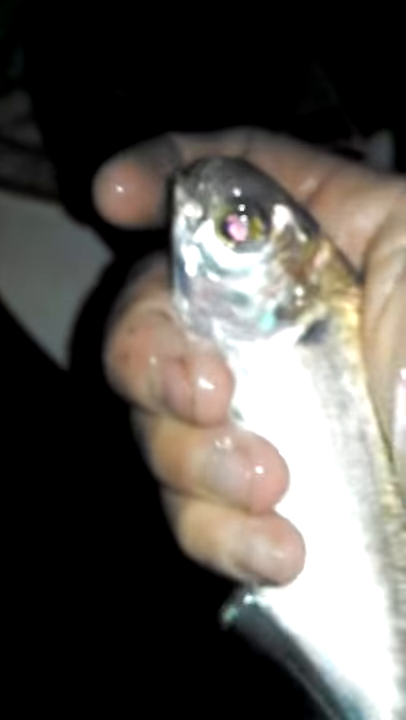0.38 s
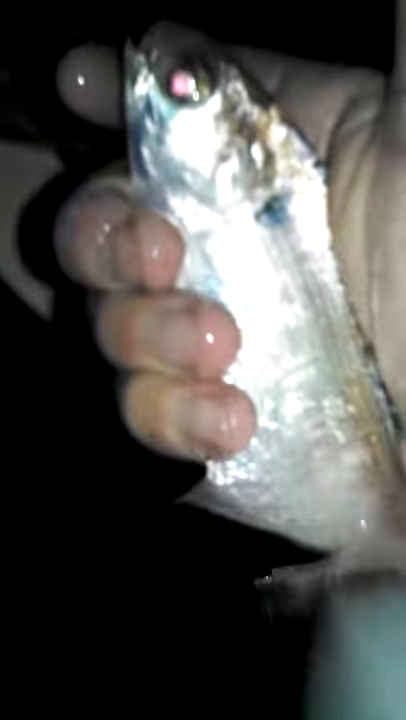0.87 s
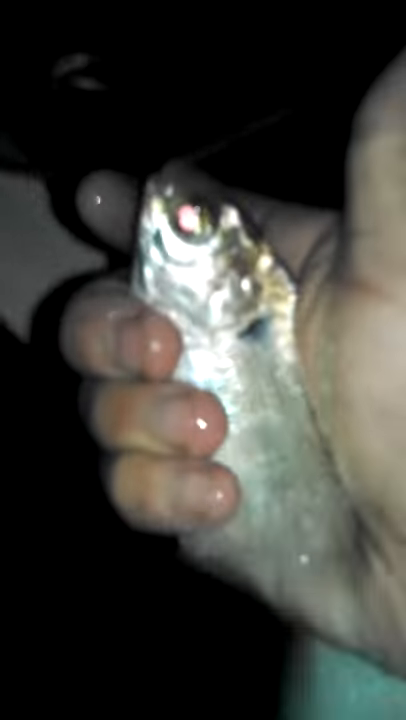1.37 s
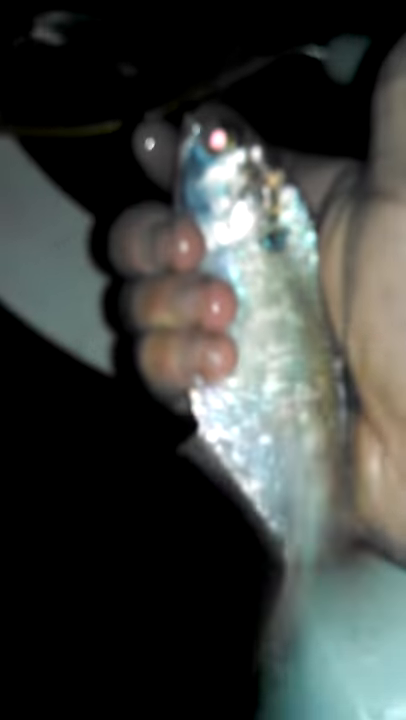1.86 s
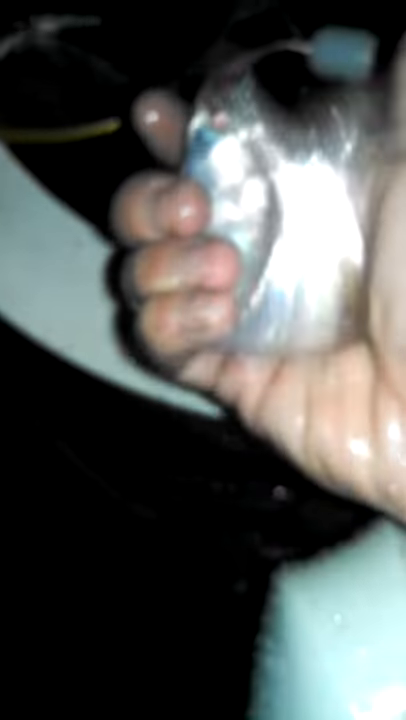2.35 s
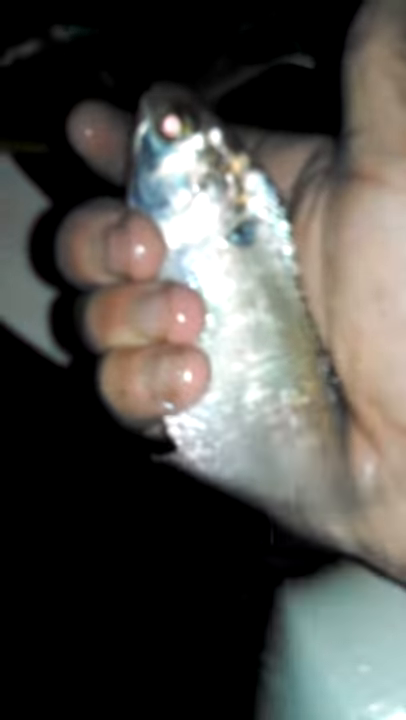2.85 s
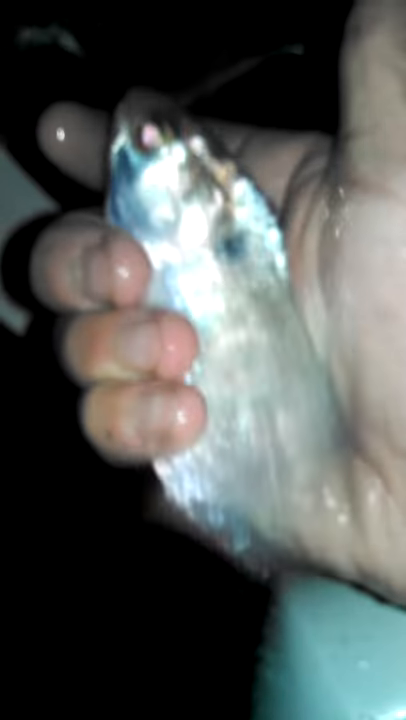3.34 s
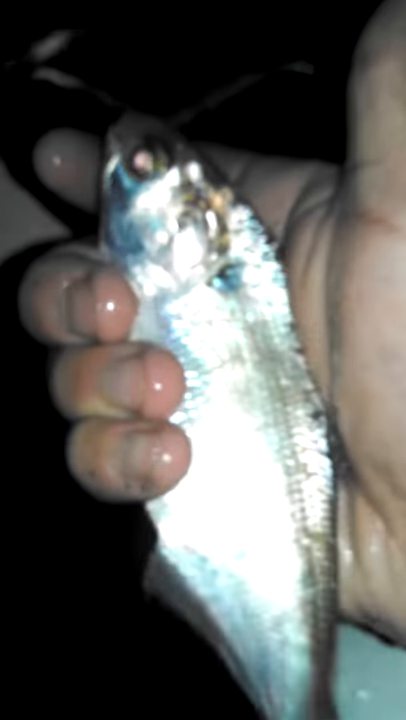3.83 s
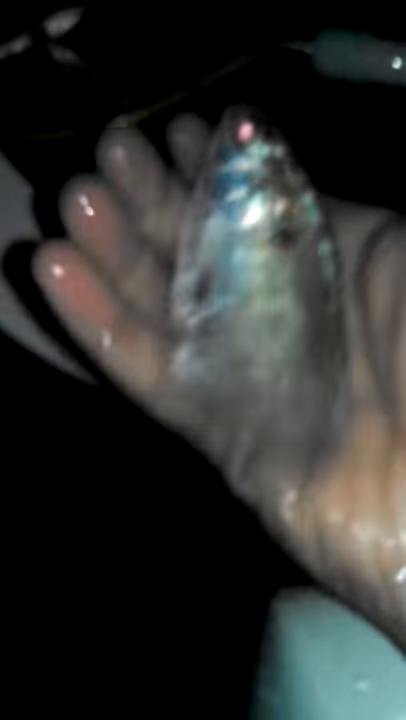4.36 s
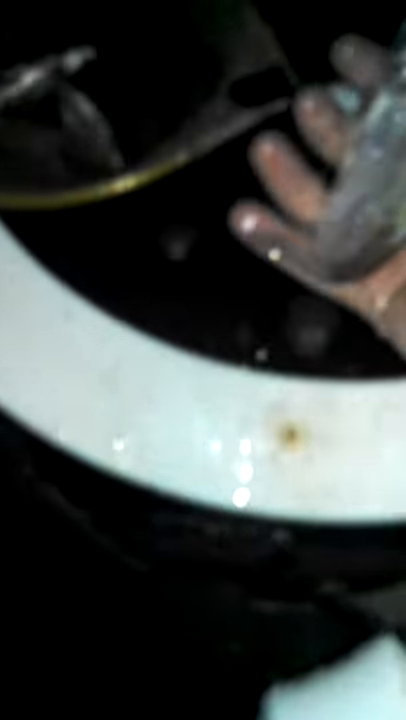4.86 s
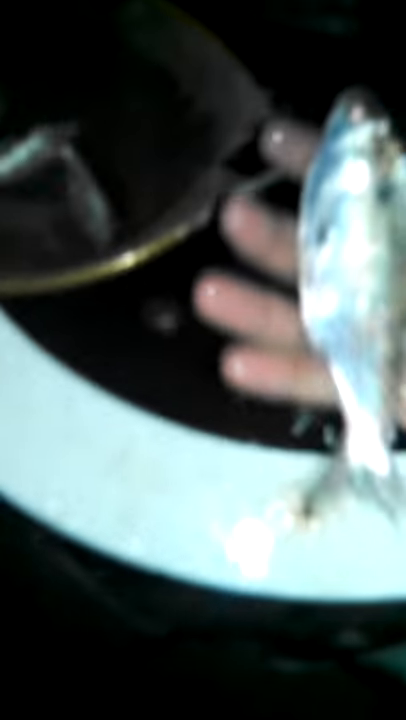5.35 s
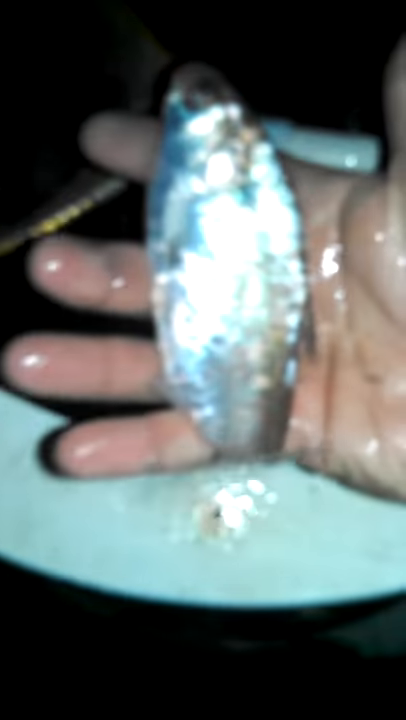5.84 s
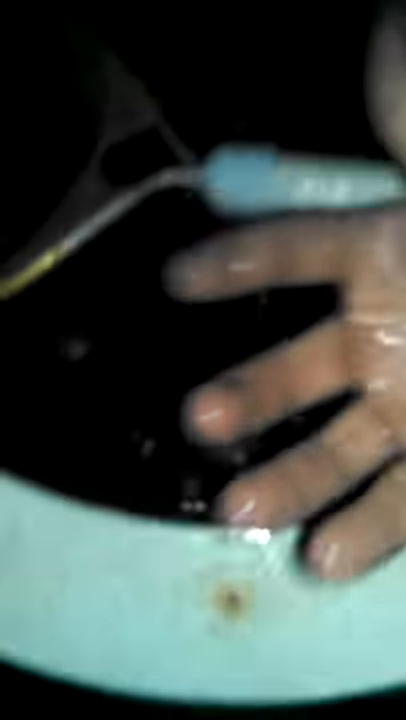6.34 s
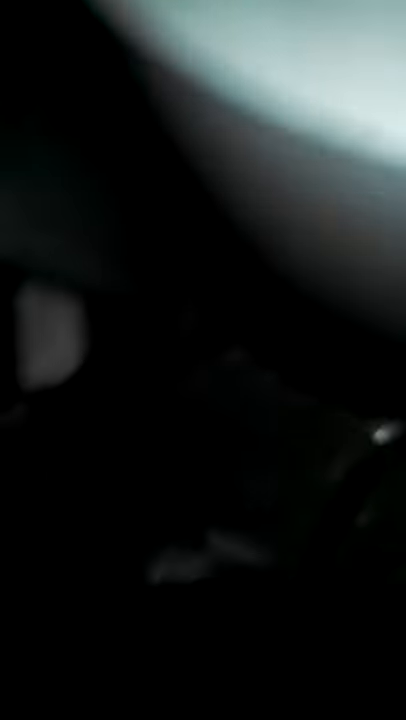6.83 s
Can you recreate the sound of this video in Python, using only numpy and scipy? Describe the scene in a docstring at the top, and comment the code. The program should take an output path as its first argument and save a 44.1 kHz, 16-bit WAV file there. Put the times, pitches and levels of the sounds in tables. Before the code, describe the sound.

From the first moment to the end at about 7.2 seconds, a small pump runs in a fish tank: a low, buzzing hum near 49 hertz with strong overtones, sagging very slightly in pitch after 3 seconds. Over it lies an even, grainy hiss of churned water, bubbling and hollow with tank resonances, its low gurgle gently rising and falling. Very short, bright drop ticks click irregularly, with strong ones near 0.3, 1.3, 2.6, 3.8, 4.3, 4.9 and 5.6 seconds; each loud tick pushes the whole sound down, and it creeps back up. Around 6.2 to 6.3 seconds two dull bumps strike the casing, then a firmer knock at 6.55, fainter thumps, and a brighter knock near 7.17. Meanwhile the hum's second overtone swells and its upper buzz fades. The phone pickup is close, wide and slightly processed, with the extreme treble cut.

```python
"""A small pump hums and churns the water of a bait tank; drops tick, a hand bumps the casing near the end.
Hum: multiples of the shaft rate. Churn: bursting-bubble noise coloured by tank resonances.
Ticks and bumps: short decaying sines. A phone hears it through two microphones, subtracts from each
the delayed other one to widen the image, and limits: loud ticks duck the whole sound, which creeps back up."""
import sys
import numpy as np
from scipy import signal
from scipy.fft import rfft, irfft, next_fast_len
from scipy.io import wavfile

SR = 44100
rng = np.random.default_rng(int(sys.argv[2]) if len(sys.argv) > 2 else 0)


def bounce(signal):
    """Save signal as a 16-bit WAV file at the path given by the first command-line argument."""
    frames = np.transpose(np.atleast_2d(signal))
    limited = np.clip(frames, -1, 1)
    pcm = np.round(limited * 32767).astype(np.int16)
    wavfile.write(sys.argv[1], SR, pcm)


def magnitude_from_level(level_db):
    """Linear magnitude for a level in decibels (20 dB per decade)."""
    exponent = np.asarray(level_db, float) / 20
    return 10 ** exponent


N = 317520


def rms_one(x):
    """Scale to unit rms."""
    return x / np.sqrt(np.mean(x ** 2) + 1e-20)


def at_hz(rows, hz):
    """Columns of a frequency table, interpolated on a log axis."""
    centre_hz, *columns = np.transpose(rows)
    return [np.interp(np.log(hz), np.log(centre_hz), c) for c in columns]


def in_time(rows):
    """Columns of a time table at every sample."""
    s, *columns = np.transpose(rows)
    return [np.interp(np.arange(N) / SR, s, c) for c in columns]


def drift(rate_hz):
    """Slow unit-rms noise: white noise through two equal poles at rate_hz, run at SR / 40."""
    pole = np.exp(-80 * np.pi * rate_hz / SR)
    noise = rng.standard_normal(N // 40 + 2002)
    slow = signal.lfilter([1], [1, -2 * pole, pole * pole], noise)[2000:]   # settled part
    return np.interp(np.arange(N) / 40, np.arange(len(slow)), rms_one(slow))


def ping(hz, t60_s):
    """Exponentially decaying sine, 0.1 s long, peak 1."""
    t = np.arange(round(.1 * SR)) / SR
    wave = np.sin(2 * np.pi * hz * t) * magnitude_from_level(-60 * t / t60_s)
    return wave / np.abs(wave).max()


def add(track, s, sound):
    """Mix a sound into the track at s seconds."""
    i = round(s * SR)
    track[..., i:i + sound.shape[-1]] += sound[..., :N - i]


# shaft harmonics before the late shift in balance:
# (multiple of shaft rate [1], front level [dB rms], rear minus front [dB], rear phase lead [rad])
HARMONICS = [(1, -36, 2, -0.12), (2, -36.5, -3.5, -0.5), (3, -33, 2, -0.38), (4, -52, 2, -0.34),
             (5, -48.5, 0, -0.24), (6, -59.5, -4, -.33), (7, -55, 5.5, -0.77), (9, -63.5, 3.5, -1.7),
             (10, -54, -3.5, -0.63), (12, -58, -6, -0.52)]
SECOND_SWELL_DB, UPPER_FADE_DB = 7.5, -6.0   # late change of multiple 2, of multiples above 3
LEAD_LEFT = 0.7   # share of the rear phase lead left after the shift


def hum(angle_rad, swing, waver_db, spread_rad):
    """Wavering multiples of the shaft rate, higher ones further out of step; swing 0-1 shifts their balance."""
    out = np.zeros((2, N))
    lead_share = 1 - (1 - LEAD_LEFT) * swing
    for multiple, db, rear_db, lead_rad in HARMONICS:
        swing_db = swing * (SECOND_SWELL_DB * (multiple == 2) + UPPER_FADE_DB * (multiple > 3))
        height = np.sqrt(2) * magnitude_from_level(db + swing_db + waver_db * multiple * drift(2.8))
        phase = multiple * angle_rad + spread_rad * multiple ** 2
        front = np.cos(phase)
        rear = magnitude_from_level(rear_db) * np.cos(phase + lead_rad * lead_share)
        out += height * np.array([front, rear])
    return out


def bursts(gurgle_db, cycles_apart, spread_db, grain_share, patchy_db):
    """Two unrelated swarms of bursting bubbles over a smooth rush, in third-octave bands; flat, 0 dB per Hz."""
    out, surge = 0, drift(17.0)
    edges_hz = 25 * 2 ** (np.arange(29) / 3)
    rush, chance = rng.standard_normal((2, N)), rng.random((2, N))
    sizes = magnitude_from_level(spread_db * np.minimum(rng.exponential(1, (2, N)), 5))
    sizes = sizes * rng.choice([-1, 1], (2, N))
    for k, (low, high) in enumerate(zip(edges_hz, edges_hz[1:])):
        shift = k * (N // 31)   # each band reads the draws from another place
        # small bubbles ring higher and burst more often
        burst = np.roll(chance, 2 * shift, axis=1) < low / cycles_apart / SR
        pops = rms_one(np.roll(sizes, shift, axis=1) * burst)
        share = np.clip(grain_share, 0, 1) / (1 + (650 / low) ** 2)   # the low rush is smooth
        drive = np.sqrt(share) * pops + np.sqrt(1 - share) * np.roll(rush, shift, axis=1)
        band = signal.sosfilt(signal.butter(2, [low, high], "band", fs=SR, output="sos"), drive)
        swell_db = gurgle_db / (1 + (low / 1600) ** 4)   # big bubbles come in clusters
        out = out + band * magnitude_from_level(swell_db + patchy_db * (0.63 * surge + drift(17.6)))
    return rms_one(out) * np.sqrt(edges_hz[-1])


# churned water at the front microphone before the resonances: (frequency [Hz], density [dB per Hz])
CHURN_COLOUR = [(30, -52), (70, -63), (130, -66), (220, -72), (400, -73.5), (610, -76.5), (800, -71.5),
                (1500, -71.5), (3000, -72), (3700, -75.5), (4700, -70.5), (7000, -70), (9000, -70),
                (10500, -77), (12500, -75.5), (14800, -78.5)]
# tank and air-space resonances, a negative rise being a dip:
# (centre [Hz], full width at 3/4 of the dB rise [Hz], rise [dB])
TANK_MODES = [(274, 24, 9), (508, 42, 10), (687.2, 53.5, 16.5), (945, 65, 7.5), (1047.5, 70, 10.5),
              (1108, 85, 2), (1361, 38, 10.5), (1506, 9.7, 6), (1614, 16, 8), (1830, 104, 3),
              (2013, 40, 11.5), (2191, 30, 10.5), (2543, 110, 5.5), (2863, 67, -4.5), (2915, 89, 12.5)]
# rear microphone: (frequency [Hz], rear minus front [dB], likeness [0-1], phase lead [rad])
REAR_CHURN = [(30, -4.9, 0.82, -3), (65, -1, 0.96, 0.7), (219, -1, 0.91, -1.16), (376, 2, 0.9, 0),
              (500, -1, 0.76, -1.84), (600, -6, 0.7, 0.5), (716, 4, 0.95, -0.45), (807, -2, 0.5, -1.7),
              (1030, -2, 0.79, -2.0), (1670, 1, 0.91, -2.5), (1945, -8.5, 0.17, -3),
              (2152, -1.5, 0.65, -3.5), (3166, 5, 0.56, -6), (4710, -4.5, 0.42, -8), (6830, -5.5, 0, -7),
              (9700, -4, 0, -12.5), (14900, 7.5, 0.15, -7)]


def churn(angle_rad, gurgle_db, throb):
    """Bubble noise coloured by the tank; the rear microphone shares part of it, shifted in phase and level."""
    size = next_fast_len(N)
    hz = np.arange(size // 2 + 1) * SR / size + 1e-3   # keeps the log finite
    bubbles = bursts(gurgle_db, cycles_apart=4.0, spread_db=4.5, grain_share=0.48, patchy_db=1.61)
    # the impeller pushes the jet once a turn
    shared, apart = rfft(bubbles * (1 + throb * np.cos(angle_rad)), size)
    colour = magnitude_from_level(at_hz(CHURN_COLOUR, hz)[0])
    for centre_hz, width_hz, rise_db in TANK_MODES:
        colour = colour * magnitude_from_level(rise_db / (1 + (2 * (hz - centre_hz) / width_hz) ** 2 / 3))
    rear_db, alike, lead_rad = at_hz(REAR_CHURN, hz)
    alike = np.clip(alike, 0, 1)
    rear = alike * np.exp(1j * lead_rad) * shared + np.sqrt(1 - alike ** 2) * apart
    return irfft(colour * np.array([shared, magnitude_from_level(rear_db) * rear]), size)[:, :N]


# loudest drops at the front microphone, before widening and limiting: (time [s], peak level [dB])
LOUD_TICKS = [(.2931, -8.5), (1.0307, -13.5), (1.1006, -14), (1.1598, -10.5), (1.2939, -9), (1.3361, -7.5),
              (2.034, -11), (2.521, -11), (2.6412, -6), (2.89, -9), (3.0656, -9), (3.29, -8),
              (3.7921, -6.5), (4.0828, -9), (4.303, -6.5), (4.8717, -7.5), (4.957, -6.5), (5.3008, -10),
              (5.606, -9), (5.6398, -6), (6.3847, -20), (6.4838, -9), (6.6454, -9.5), (6.9247, -7.5)]
SMALL_TICKS_PER_S, SMALL_TICK_DB, SMALL_TICK_SPREAD_DB = 2.7, -18, 3.0   # spread is +-
TICK_LOW_HZ, TICK_HIGH_HZ = 6060, 14000


def ticks(cycles, rear_db):
    """Each drop rings a few cycles at a pitch of its own; small ones fall at random between the loud ones."""
    out = np.zeros((2, N))
    chance = rng.random((60, 2))
    small_s = np.cumsum(-np.log(1 - chance[:, 0])) / SMALL_TICKS_PER_S
    small_db = SMALL_TICK_DB + SMALL_TICK_SPREAD_DB * (2 * chance[:, 1] - 1)
    drops = LOUD_TICKS + [row for row in zip(small_s, small_db) if row[0] < N / SR]
    for (s, db), pitch in zip(drops, rng.random(len(LOUD_TICKS) + len(chance))):
        hz = TICK_LOW_HZ * (TICK_HIGH_HZ / TICK_LOW_HZ) ** pitch
        add(out, s, magnitude_from_level([[db], [db + rear_db]]) * ping(hz, cycles / hz))
    return out


# hand bumps on the casing, before widening and limiting:
# (time [s], front peak level [dB], brightness [dB per octave], rear minus front [dB])
KNOCKS = [(6.215, -21, -6, -9), (6.28, -20, -7, -8), (6.555, -13.5, 3, 4.5), (6.609, -26, -8, -10),
          (6.859, -31, -12, -7), (7.167, -18.5, 11, 6), (7.182, -20, -5, 5)]
# casing modes: (frequency [Hz], relative level at zero brightness [dB], t60 [s])
CASING_MODES = [(55, -4, 0.099), (99.8, -15, 0.058), (170, 5, 0.067), (251, 8.5, 0.027), (338, -6, 0.057),
                (690, -11.5, 0.027)]


def bumps(soft_s):
    """Each knock strikes every casing mode, brightness tilting them about 250 Hz; skin softens the attack."""
    out = np.zeros((2, N))
    for s, db, tilt_db, rear_db in KNOCKS:
        knock = 0
        for hz, mode_db, t60_s in CASING_MODES:
            knock = knock + magnitude_from_level(mode_db + tilt_db * np.log2(hz / 250)) * ping(hz, t60_s)
        knock = knock * (1 - np.exp(-np.arange(len(knock)) / SR / soft_s))
        add(out, s, magnitude_from_level([[db], [db + rear_db]]) * knock / np.abs(knock).max())
    return out


# shaft speed, sagging under load: (time [s], speed [turns per s])
SHAFT_SPEED = [(0, 49.02), (3.1, 48.92), (3.5, 48.67), (7.2, 48.52)]
# low gurgle against the hiss: (time [s], level [dB])
GURGLE_LEVEL = [(0, -0.5), (1.3, -2.5), (2.5, -1.5), (3.6, -4), (4.7, -0.5), (5.7, -2), (6.15, -0.5),
                (6.55, 0.5), (7.0, -2), (7.2, -2)]
SWING_START_S, SWING_S = 6.34, 0.95   # late shift of the hum's balance


def scene():
    """Sum of pump hum, churn, ticks and bumps at the front and rear microphone."""
    turns_per_s, = in_time(SHAFT_SPEED)
    gurgle_db, = in_time(GURGLE_LEVEL)
    angle_rad = 2 * np.pi * np.cumsum(turns_per_s) / SR
    swing = np.clip((np.arange(N) / SR - SWING_START_S) / SWING_S, 0, 1)
    pump = hum(angle_rad, swing, waver_db=0.12, spread_rad=.8)
    water = churn(angle_rad, gurgle_db, throb=.06)
    return pump + water + ticks(cycles=4.0, rear_db=-8) + bumps(soft_s=0.0018)


CROSS_LAG_SAMPLES, BOOST_DB = 16, 0.5


def widen(x):
    """Subtract from each microphone the delayed other one, then boost."""
    late = np.pad(x[::-1], ((0, 0), (CROSS_LAG_SAMPLES, 0)))[:, :N]
    return magnitude_from_level(BOOST_DB) * (x - late)


CEILING_DB, RECOVERY_DB_PER_S = -11.5, 10.5
START_DUCK_DB = 3   # the limiter is still recovering at the start


def limit(x):
    """Instant-attack peak limiter, linked across channels, recovering at a constant dB rate."""
    over_db = 20 * np.log10(np.abs(x).max(axis=0) + 1e-9) - CEILING_DB
    ramp_db = RECOVERY_DB_PER_S * np.arange(N) / SR
    held_db = np.maximum(np.maximum.accumulate(over_db + ramp_db), START_DUCK_DB)
    duck_db = np.maximum(held_db - ramp_db, 0)
    return x * magnitude_from_level(-duck_db)


CUTOFF_HZ = 15450


def cut_top(x):
    """Steep zero-phase elliptic low-pass."""
    return signal.sosfiltfilt(signal.ellip(10, .5, 40, CUTOFF_HZ, fs=SR, output="sos"), x)


WEAK_DB = -9.5


def drop_weaker(x):
    """Per band and frame, drop the sum or difference where it lies WEAK_DB or further below the other."""
    mid_side = np.array([x[0] + x[1], x[0] - x[1]]) / 2
    _, _, frames = signal.stft(mid_side, SR, nperseg=2048)
    power = np.abs(frames) ** 2
    for low in range(52, 764, 8):   # 8-bin bands, about 1.1 to 16.4 kHz
        band = power[:, low:low + 8].sum(axis=1)
        keep = band > magnitude_from_level(WEAK_DB) ** 2 * band[::-1]
        frames[:, low:low + 8] *= keep[:, None]
    total, apart = signal.istft(frames, SR, nperseg=2048)[1][:, :N]
    return np.array([total + apart, total - apart])


def top_cut(x):
    """Nothing passes above the cut-off."""
    return signal.sosfilt(signal.butter(12, 16860, fs=SR, output="sos"), x)


def record(dry):
    """The phone: widening by cross-subtraction, limiter, cut top, weaker sum or difference dropped."""
    limited = limit(widen(dry))
    mix = drop_weaker(cut_top(limited))
    return top_cut(mix)


dry = scene()
out = record(dry)
bounce(out)
```